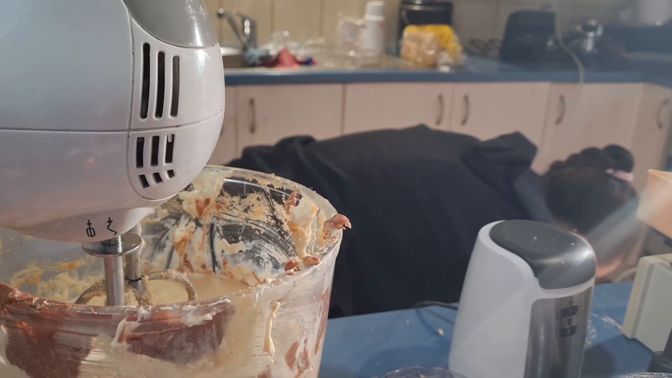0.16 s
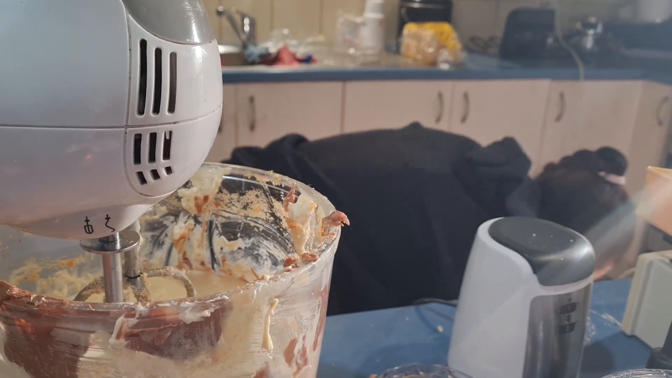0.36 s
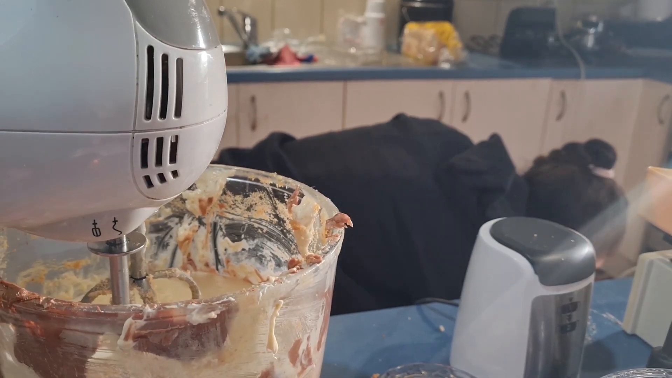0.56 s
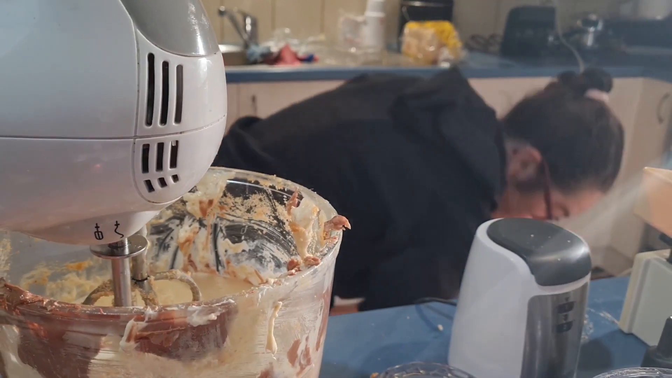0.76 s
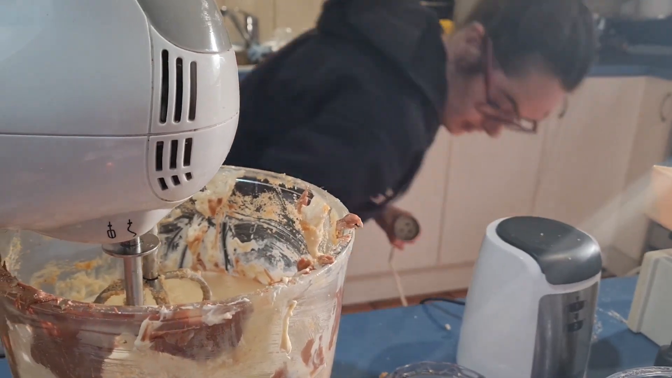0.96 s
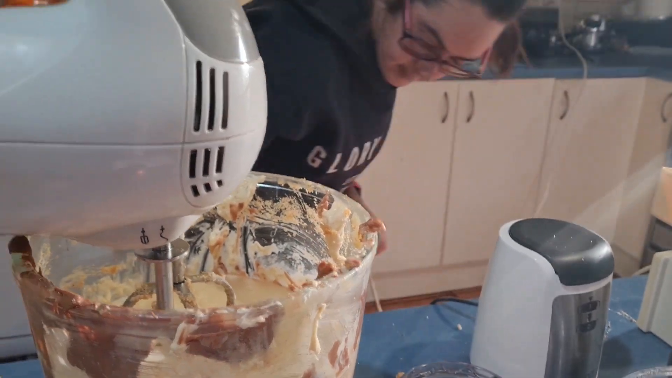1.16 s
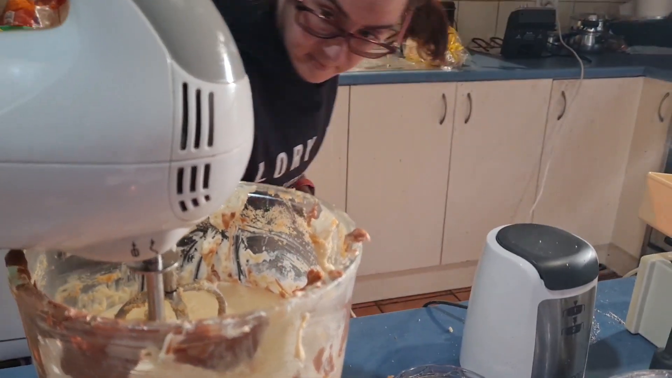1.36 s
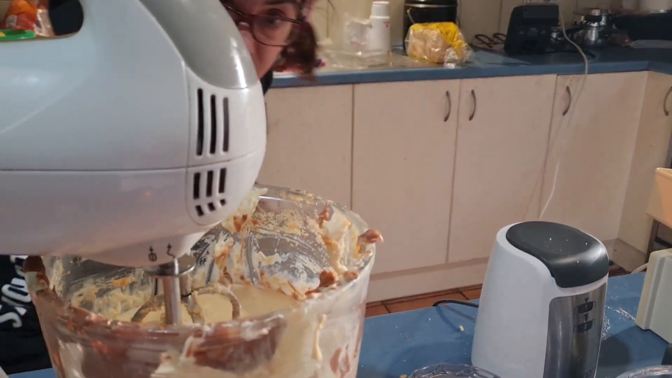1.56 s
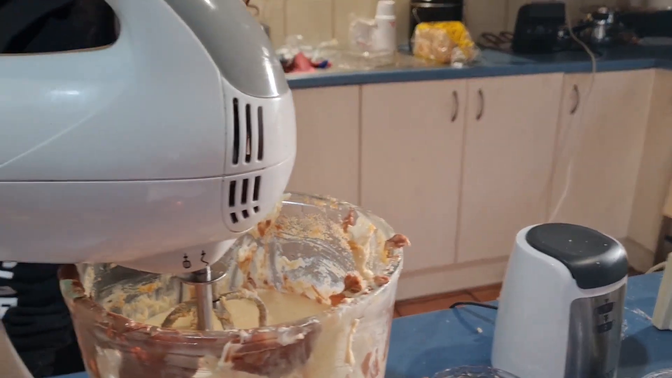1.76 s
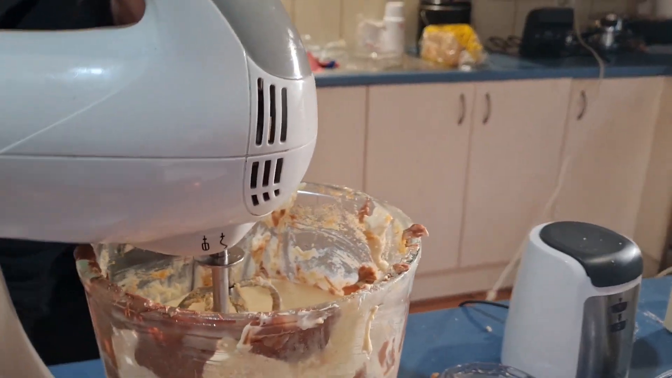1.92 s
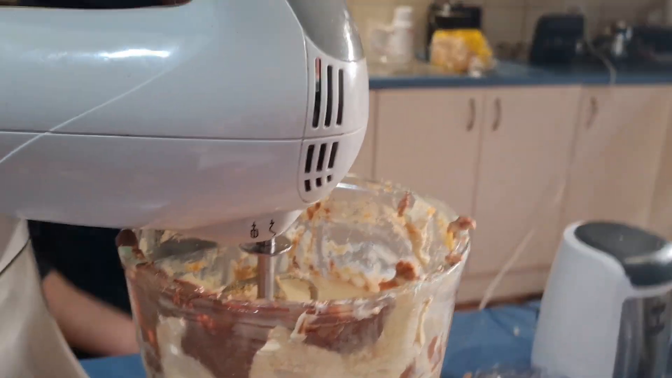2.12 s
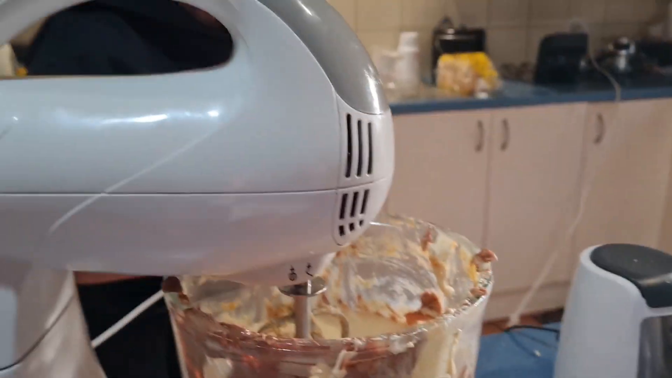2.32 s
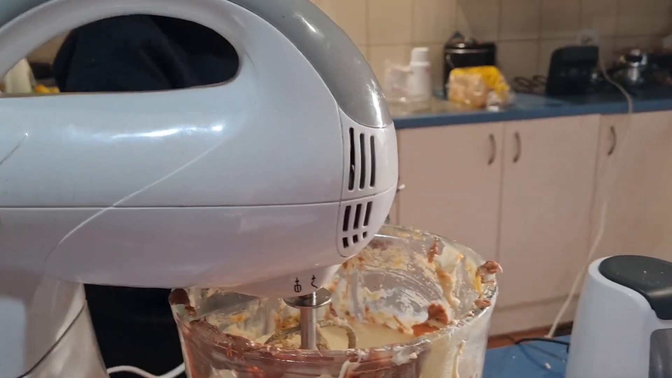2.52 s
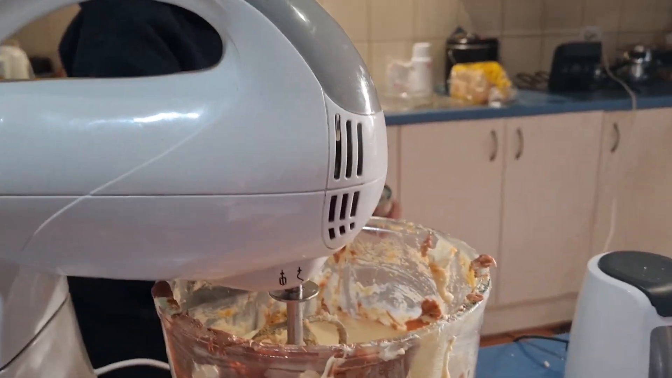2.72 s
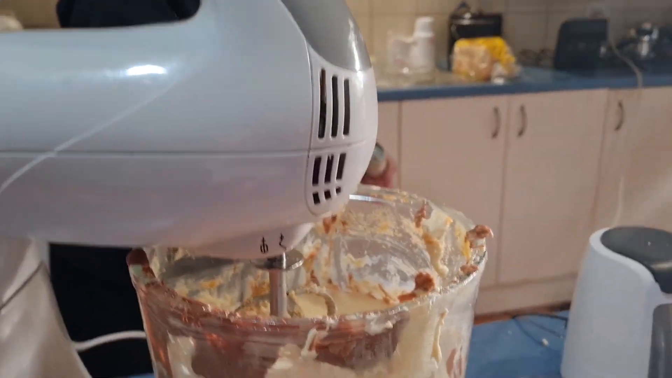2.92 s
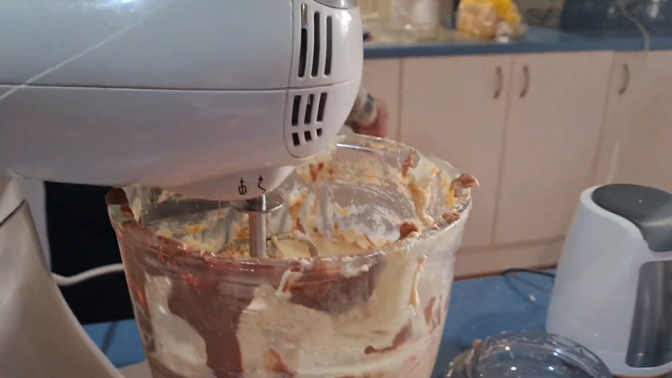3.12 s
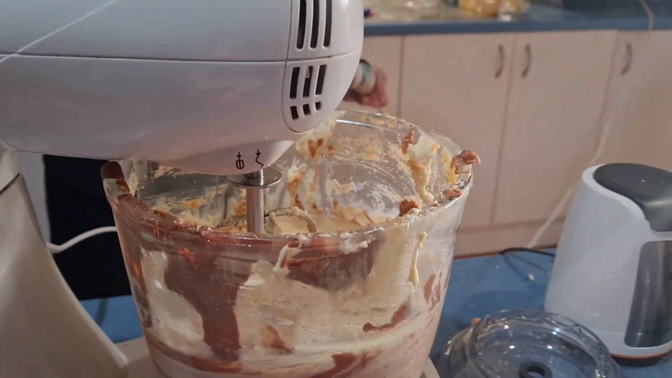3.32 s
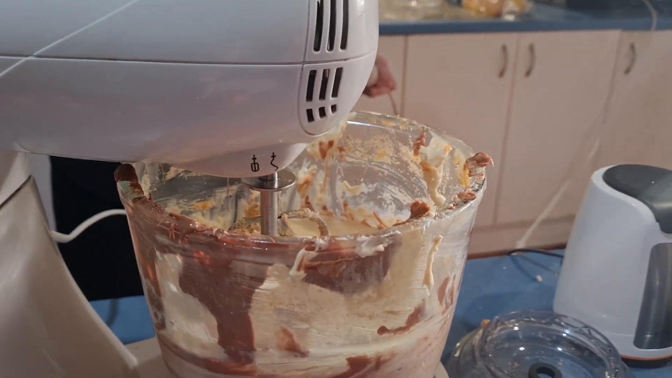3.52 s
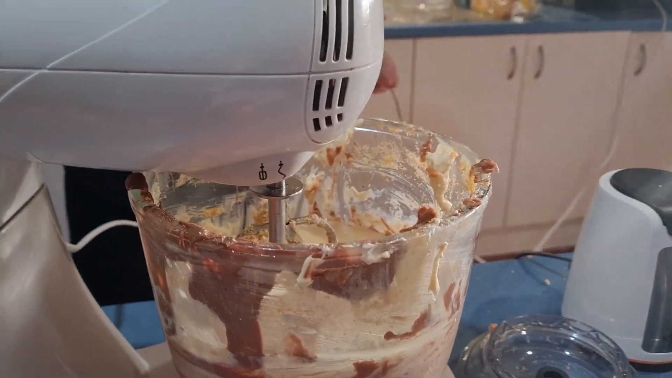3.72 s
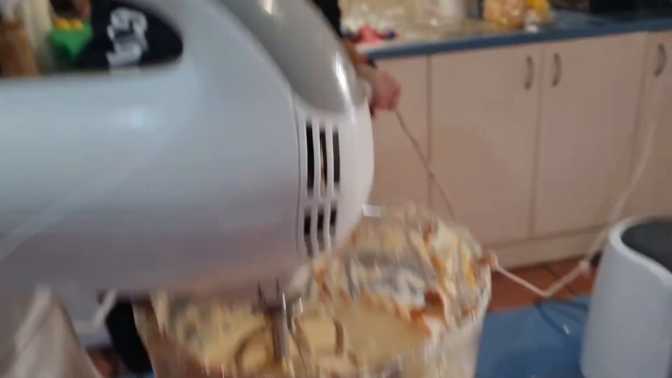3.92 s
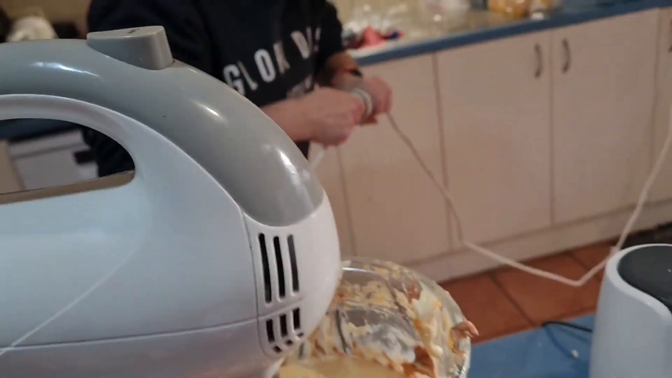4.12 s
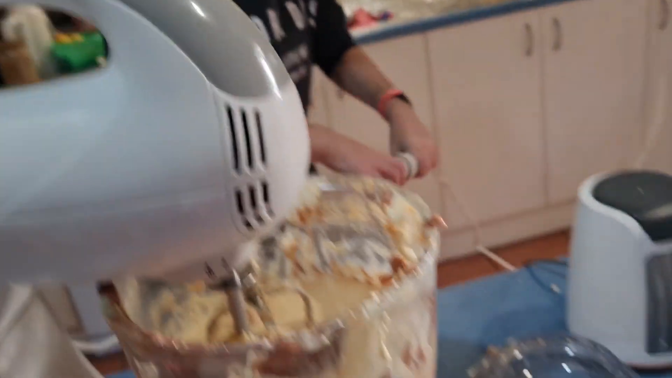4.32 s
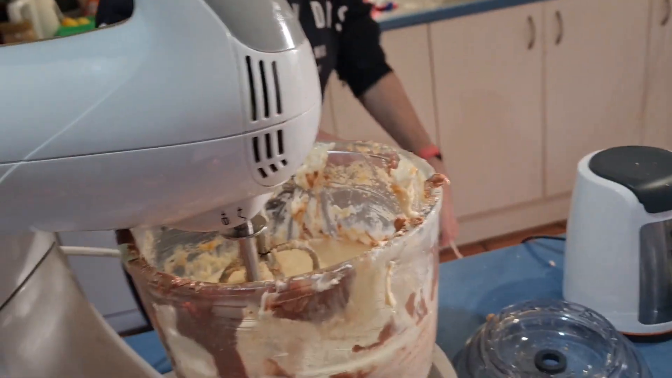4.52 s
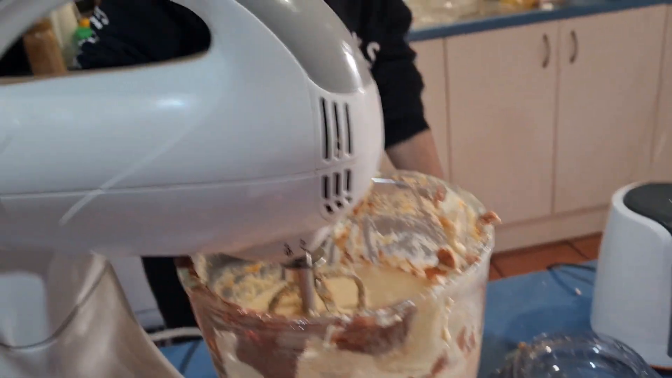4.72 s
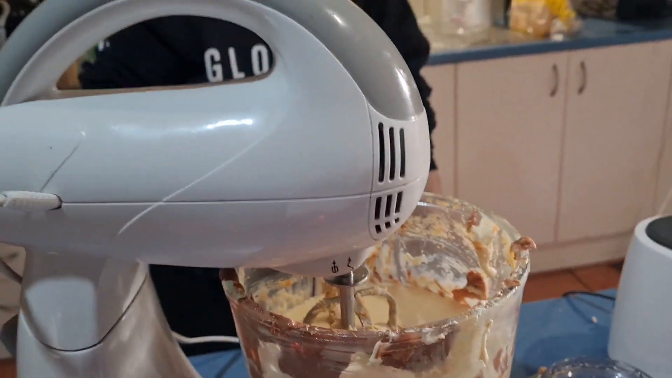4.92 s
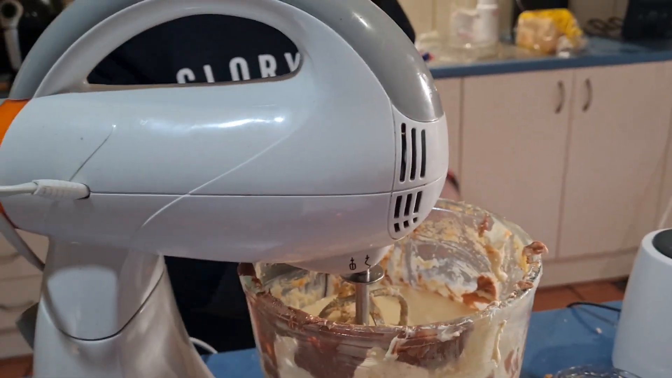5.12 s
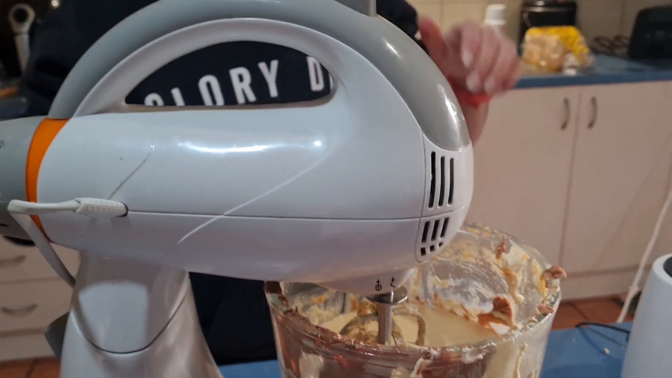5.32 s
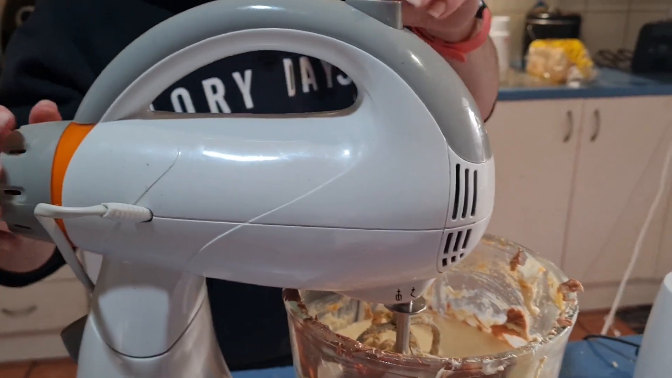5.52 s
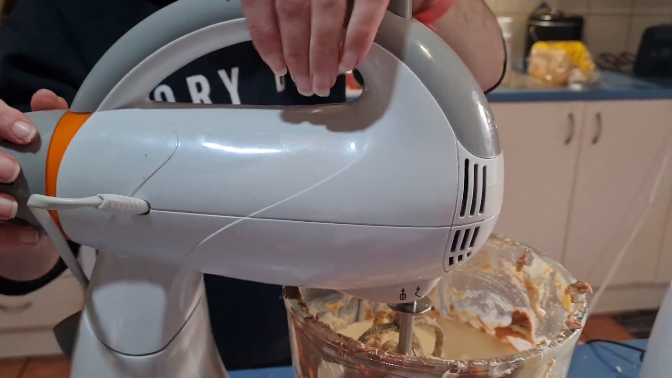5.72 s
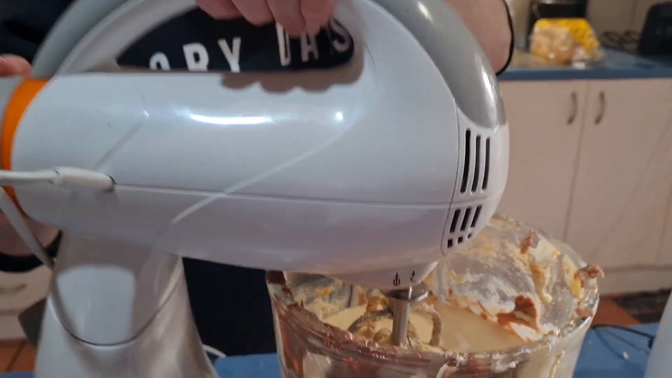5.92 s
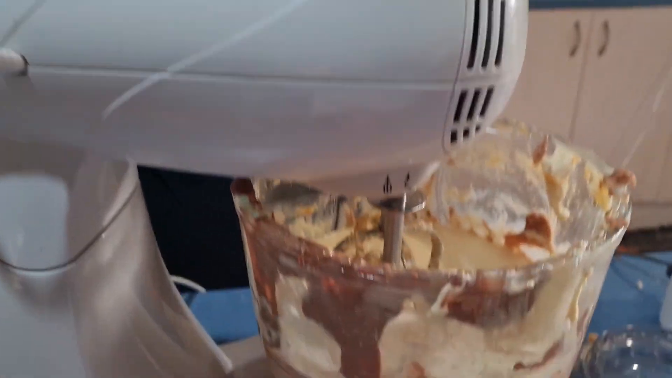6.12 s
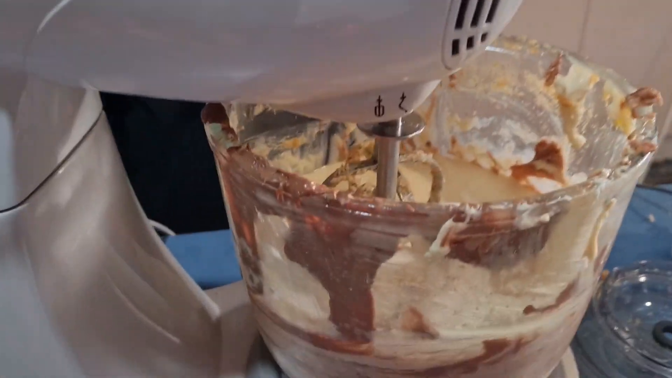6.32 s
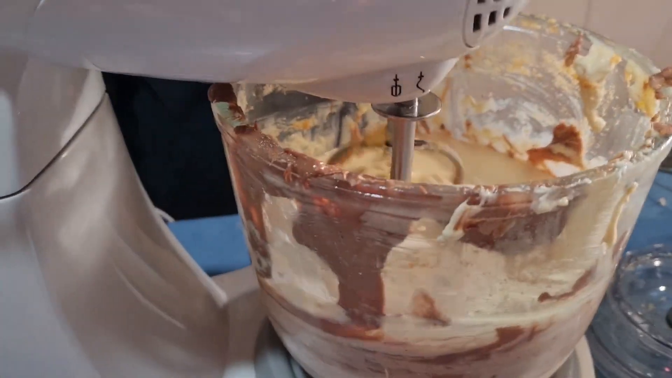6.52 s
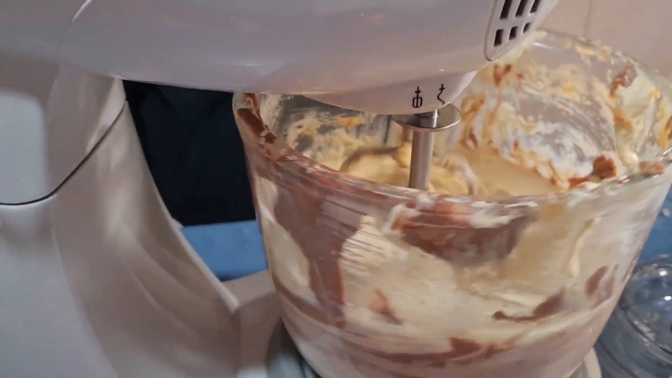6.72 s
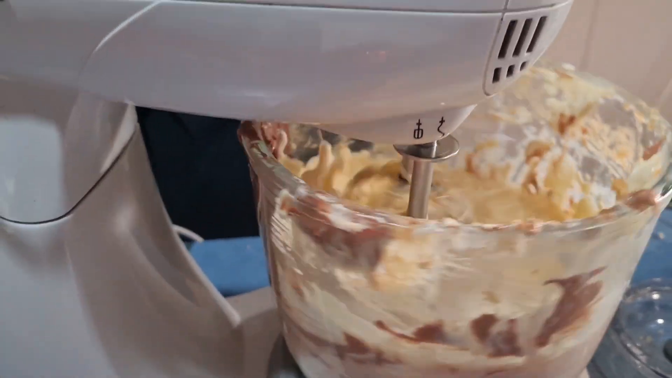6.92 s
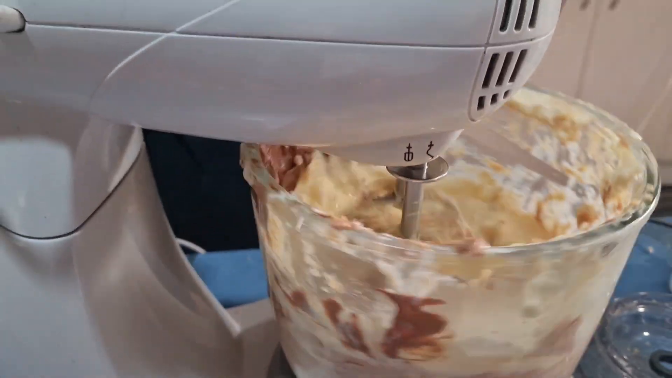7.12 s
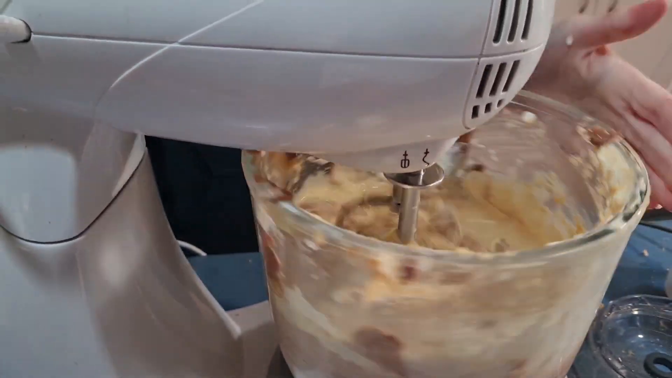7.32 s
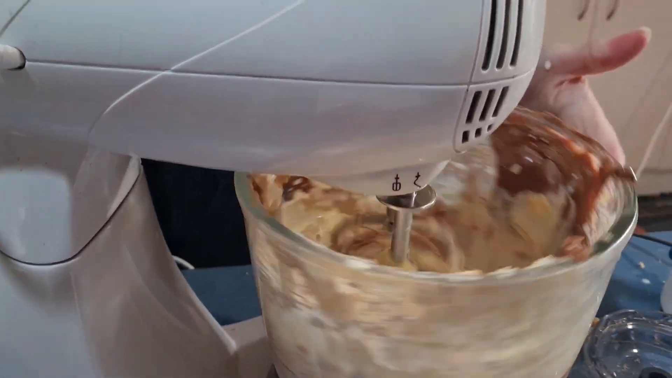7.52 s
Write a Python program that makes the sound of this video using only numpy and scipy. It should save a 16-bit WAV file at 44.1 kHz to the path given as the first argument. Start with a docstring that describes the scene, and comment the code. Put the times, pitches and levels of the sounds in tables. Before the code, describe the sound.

Soft cloth swishes, scattered plastic clacks and a thin singing cord lead to a sharp click and a stand mixer's rising, buzzing motor whine.

```python
"""A small kitchen: over room hush, sleeves swish, a plug knocks about, plastic scrapes and a pulled cord sings.
At 6.44 s a switch snaps, the housing rings and a hand mixer on its stand runs up with a jolt of mains hum.
Shaft and commutator tones, gear rattle, fan air and brush hiss follow its speed; sharp ticks cut in.
Rubbing and air are shaped noise, knocks are short clatters with ringing modes, tones follow the shaft angle."""
import sys
import numpy as np
from scipy import signal
from scipy.fft import rfft, irfft
from scipy.io import wavfile

SR = 44100
rng = np.random.default_rng(int(sys.argv[2]) if len(sys.argv) > 2 else 0)


def log_audio(samples):
    """Write samples as a 16-bit WAV file to the path given in sys.argv[1]."""
    # one column per channel
    frames = np.atleast_2d(samples).T
    # limit to full scale, then quantise
    limited = np.clip(frames, -1, 1)
    pcm = np.round(limited * 32767).astype(np.int16)
    wavfile.write(sys.argv[1], SR, pcm)


N = 337792
T, HZ = np.arange(N) / SR, np.fft.rfftfreq(N, 1 / SR)
ON_S, RIPPLE_HZ = 6.441, 100  # switching on; torque ripple of the mains
FULL_SPEED_HZ = 155.7  # shaft turns per second


def amp(db):
    """Amplitude of a level in dB."""
    return 10 ** (np.asarray(db) / 20)


def unit(x):
    """Scale to an RMS of 1."""
    return x / np.sqrt(np.mean(x ** 2, axis=-1, keepdims=True) + 1e-20)


def read(points, hz):
    """Interpolate a table over log frequency."""
    f, value = np.transpose(points)
    return np.interp(np.log(hz + 1), np.log(f + 1), value)


def colour(x, points):
    """Filter by a spectrum in dB."""
    return irfft(rfft(x) * amp(read(points, HZ)), N)


def noise(points):
    """A mid and side pair of noises with one spectrum."""
    return unit(colour(rng.standard_normal((2, N)), points))


def wander(hz):
    """Random fluctuation up to about the given rate."""
    return unit(irfft(rfft(rng.standard_normal(N)) / (1 + (HZ / hz) ** 4), N))


def add(mix, s, sound):
    """Mix a sound in at a time in s."""
    part = mix[:, max(round(s * SR), 0):][:, :sound.shape[-1]]
    part += sound[..., :part.shape[-1]]


def resonances(rows):
    """Noise in a few steep resonant bands, as mid and side."""
    out = np.zeros((2, N))
    for hz, width_hz, db in rows:
        response = 1 / (1 + ((HZ - hz) / width_hz) ** 2) ** 2
        out += amp(db) * unit(irfft(rfft(rng.standard_normal((2, N))) * response, N))
    return out


def kitchen(x):
    """Tiles and cupboard doors return a short dense tail of the mid, as mid and side."""
    # decay of the room: (frequency [Hz], t60 [s])
    decay = [(150, 0.33), (600, 0.32), (2500, 0.21), (6000, 0.23), (15000, 0.31)]
    taps = rng.standard_normal((2, SR // 2)) * (T[:SR // 2] > .005)
    hz, t, z = signal.stft(taps, SR, nperseg=256)
    fade = amp(-60 * t / read(decay, hz)[:, None])
    tail = signal.istft(z * fade, SR, nperseg=256)[1]
    return signal.fftconvolve(x[:1], tail / np.linalg.norm(tail[0]), axes=1)[:, :N]


def stroke(s, db, rise_s, t60_s, hold_s=0):
    """The power of one rubbing movement: it swells to a peak, holds and dies away."""
    swell = np.exp(-(np.minimum(T - s, 0) / rise_s) ** 2)
    return amp(db - 60 * np.maximum(T - s - hold_s, 0) / t60_s) ** 2 * swell


def friction(power, spectrum, grain_db):
    """Grainy rubbing noise that follows the power of the strokes."""
    return np.sqrt(power) * unit(amp(grain_db * wander(430))) * noise(spectrum)


def with_speed(speed_hz, db, growth_db):
    """Gain of a layer: dB at full speed, dB gained per doubling of speed."""
    return amp(db + growth_db * np.log2(speed_hz / FULL_SPEED_HZ + 1e-3))


def cycle(turns):
    """Cosine of an angle counted in turns."""
    return np.cos(2 * np.pi * turns)


def tone(turns, waver_db, smear):
    """One wavering partial; its side is a quarter turn off, so both ears hear it about equally loud."""
    mid = turns + smear * wander(26)
    side = mid - 1 / 4 + .05 * wander(2)
    return np.sqrt(2) * amp(waver_db * wander(13)) * cycle(np.array([mid, side]))


def room_tone(hush_db=-63.13):
    """Low hush as shaped noise, plus a few droning resonant bands."""
    # hush spectrum: (frequency [Hz], relative density [dB])
    hush = [(15, -38), (25, -8), (66, -2.5), (121, -3.5), (207, -0.5), (309, -4.5), (488, -4.5), (588, -4),
            (673, -5), (749, -10.5), (978, -13), (3010, -26), (5570, -37.5), (7680, -45), (15000, -47)]
    # faint drone of the room: (frequency [Hz], width [Hz], level [dB])
    drone = [(80.2, 6.3, -75.5), (224.5, 67, -71), (596, 20, -73.5), (753, 93, -73.5)]
    return amp(hush_db) * noise(hush) + resonances(drone)


def swishes(rise_s=.012, t60_s=0.29):
    """Sleeves: cloth friction, one power stroke per movement."""
    # sleeve strokes: (peak time [s], level [dB])
    strokes = [(.015, -64), (.65, -51.5), (0.999, -66.5), (1.317, -57.5), (1.523, -62.5), (1.86, -69),
               (2.4, -76), (3.174, -71.5), (4.41, -76.5)]
    # cloth spectrum: (frequency [Hz], relative density [dB])
    cloth = [(300, -17), (1500, 3), (3000, 5.5), (6000, -1), (8800, 1), (11000, -8.5), (15500, -9)]
    power = sum(stroke(s, db, rise_s, t60_s) for s, db in strokes)
    return friction(power, cloth, grain_db=2.5)


def knocks(level_db=1, ring_db=-13, body_hz=800, edge_hz=4200, spot_db=8, spot_width=0.19,
           rise_share=0.02, wet_db=-7):
    """Plug, cord and switch: each contact is a quick clatter with plug modes; soft has body, hard has edge."""
    # contacts: (time [s], relative level [dB], edge [dB], contact t60 [s], resonance of the struck spot [Hz])
    hits = [(.093, -50.5, 11.5, 0.2, 2080), (.630, -40.5, -8, 0.043, 2880), (.635, -44.5, -10, 0.24, 2160),
            (1.839, -54.5, -29, 0.21, 543), (1.88, -54, 26, 0.007, 3000), (1.907, -38.5, -54, 0.055, 1170),
            (2.055, -36, -31, 0.075, 1240), (2.390, -56, -5, 0.029, 3200),
            (2.457, -39.5, -13.5, 0.074, 2160), (2.553, -44, -58, 0.05, 1720), (2.592, -59, 0, 0.029, 3250),
            (3.272, -32.5, -2.5, 0.046, 3160), (3.496, -52.5, -3.5, .074, 2120),
            (3.792, -62.5, 6.5, 0.11, 2800), (3.867, -38, 0.5, 0.059, 2130),
            (4.725, -31.5, -2.5, .023, 2230), (5.512, -51.5, -7, 0.028, 2070),
            (5.726, -53.5, -59, 0.053, 1260), (5.839, -51, -30, 0.1, 1110), (5.868, -51, 11, 0.042, 3250),
            (5.918, -56, 9, 0.021, 3100), (6.435, -47, 19, 0.056, 804), (6.4423, -22.5, 9, 0.028, 980)]
    # plastic spectrum: (frequency [Hz], relative density [dB])
    plastic = [(30, -36), (100, 4.5), (300, -1.5), (600, 7.5), (1200, 2.5), (2300, -0.5), (3300, 0),
               (5000, -10), (7000, -18), (10000, -28.5), (15000, -36)]
    # ring of the plug: (nominal frequency [Hz], t60 [s], relative level [dB])
    plug = [(625, 0.28, 2), (1258, 0.086, 6), (1716, 0.078, 5.5), (2060, 0.11, -52), (2930, 0.06, 6)]
    # spots that ring lower also have more body
    neutral_hz, body_db_per_octave = 1900, 4.5
    out, t = np.zeros((2, N)), T[:SR // 4]
    hz = np.fft.rfftfreq(2 * len(t), 1 / SR)
    shell = unit(amp(read(plastic, hz)))
    for s, db, edge_db, t60_s, spot_hz in hits:
        # a long contact also builds up slowly
        build_up = 1 - np.exp(-t / (rise_share * t60_s))
        clatter = rng.standard_normal((2, len(t))) * amp(-60 * t / t60_s) * build_up
        ring = np.zeros((2, len(t)))
        for mode_hz, life_s, mode_db in plug:
            turns = mode_hz * rng.uniform(.93, 1.2) * t + rng.random((2, 1))
            ring += amp(mode_db - 60 * t / life_s) * np.sin(2 * np.pi * turns)
        body_db = body_db_per_octave * np.log2(neutral_hz / spot_hz)
        tilt_db = body_db / (1 + (hz / body_hz) ** 4) + edge_db / (1 + (edge_hz / (hz + 1)) ** 4)
        peak_db = spot_db / (1 + ((hz / spot_hz - 1) / spot_width) ** 2)
        source = rfft(clatter, 2 * len(t)) * shell + amp(ring_db) / 2 * rfft(ring, 2 * len(t))
        hit = irfft(source * amp(tilt_db + peak_db))[:, :len(t)]
        add(out, s, amp(db + level_db) * hit)
    return out + amp(wet_db) * kitchen(out)


def bumps_and_housing_ring():
    """Dull bumps of bench and stand, and the mixer housing ringing at switch-on: each is one decaying mode."""
    # bumps, last row the housing: (time [s], level [dB], frequency [Hz], t60 [s])
    modes = [(0.094, -46.5, 154.4, 0.36), (2.052, -38.5, 86.6, 0.17), (2.06, -37, 45, 0.18),
             (4.726, -51, 168, 0.15), (5.767, -51.5, 156, 0.21), (6.443, -29.5, 999, 0.33)]
    out, t = np.zeros((2, N)), T[:SR // 2]
    for s, db, hz, t60_s in modes:
        add(out, s, amp(db - 60 * t / t60_s) * np.sin(2 * np.pi * hz * t))
    return out


def scrapes(t60_per_rise=7.5):
    """Plastic sliding on plastic; a slow slide also dies slowly."""
    # slides: (peak time [s], level [dB], rise [s])
    slides = [(1.35, -61.5, 0.022), (2.33, -65, 0.017), (4.41, -64.5, .03), (4.916, -47.5, 0.028),
              (4.986, -44, 0.0083), (5.013, -42, 0.015), (5.19, -60, 0.021), (5.36, -69, 0.069)]
    # sliding spectrum: (frequency [Hz], relative density [dB])
    sliding = [(200, -22), (600, 0), (900, -5), (1230, 10.5), (1450, -3), (1800, -2), (2900, -7.5),
               (4000, -23.5), (7000, -32), (15000, -47)]
    power = sum(stroke(s, db, rise_s, t60_per_rise * rise_s) for s, db, rise_s in slides)
    return friction(power, sliding, grain_db=1.8)


def cord(rise_s=0.021, t60_s=1.12, held_hz=4440, hold_power=5.7):
    """Each pull through the hand makes the cord sing in resonant bands; low partials drop out first."""
    # pulls: (time [s], hold [s], level [dB], pitch [share of the cord's own])
    pulls = [(2.39, 0.04, -68.5, .97), (2.83, 0.12, -72, 0.91), (4.56, 0.42, -66.5, 0.99)]
    # partials of the cord: (frequency before pitch [Hz], width [Hz], relative level [dB])
    partials = [(2540, 120, -3), (3210, 210, -4), (4530, 1000, -9.5), (5250, 200, -18)]
    out = np.zeros((2, N))
    for s, hold_s, db, pitch in pulls:
        for hz, width_hz, partial_db in partials:
            # partials from held_hz up hold for the whole pull
            held_share = min(hz / held_hz, 1) ** hold_power
            power = stroke(s, db, rise_s, t60_s, hold_s * held_share)
            out += np.sqrt(power) * resonances([(pitch * hz, width_hz, partial_db)])
    return out


def handling(wet_db=-10):
    """Sleeves, bumps, housing ring, sliding plastic and the cord, with the kitchen's tail."""
    out = swishes() + bumps_and_housing_ring() + scrapes() + cord()
    return out + amp(wet_db) * kitchen(out)


def mains_hum(ripple, speed_hz, inrush_db=-28, inrush_t60_s=0.61, inrush_slope_db=-6, surge_hum_db=-7):
    """Field coils hum at ripple multiples; the stalled motor's current surge adds hum and a stand shudder."""
    # hum of the field coils: (relative level [dB]) at each multiple of the ripple
    hum_db = [-56, -33.5, -74, -45, -43.5, -34.5, -43, -50]
    # shudder of the stand as the motor takes hold: (frequency [Hz], relative density [dB])
    jolt = [(50, -39), (130, -1.5), (280, -4.5), (450, -19), (2000, -63)]
    surge = amp(inrush_db - 60 * np.maximum(T - ON_S, 0) / inrush_t60_s)
    shake = with_speed(speed_hz, -2.5, growth_db=9.5)
    out = surge * noise(jolt)
    for k, db in enumerate(hum_db, 1):
        surge_hum = surge * amp(inrush_slope_db * abs(k - 2) + surge_hum_db)
        out += (amp(db) * shake + surge_hum) * tone(k * ripple, waver_db=3.0, smear=0.048)
    return out


def shaft_throb(shaft, ripple, speed_hz):
    """An unbalanced rotor, its force growing with speed and its torque pulsing with the mains."""
    # shaft tones: (multiple of the shaft, sideband [steps of the ripple])
    partials = [(1, 0), (1, 1), (1, 2), (3, 0), (4, 0), (5, 0), (5, 1), (12, -1), (12, 0), (12, 1), (17, 0),
                (23, 0), (25, 0), (48, 0)]
    # their levels: (relative level [dB])
    partials_db = [-7.5, -6.5, -20.5, -29, -23, -23, -19, -25, -21, -26.5, -24.5, -47, -24.5, -38]
    out = np.zeros((2, N))
    for (k, sideband), db in zip(partials, partials_db):
        waver_db, smear = min(2.0 * np.sqrt(k), 3), 0.011 * np.sqrt(k)
        out += amp(db) * tone(k * shaft + sideband * ripple, waver_db, smear)
    return with_speed(speed_hz, -24.5, growth_db=25.5) * out


def whine(shaft, speed_hz, bars=24, clear_db=-35, chatter_db=-46.5, chatter_growth_db=6):
    """Commutator bars sing out at each housing resonance; between them only chatter is left."""
    # resonances of the housing: (frequency [Hz], width [Hz], relative level [dB])
    housing = [(2720, 130, -4), (3170, 230, 0), (3835, 65, -2.5), (4010, 40, -4)]
    clear = sum(amp(clear_db + db) / (1 + ((bars * speed_hz - hz) / width_hz) ** 4)
                for hz, width_hz, db in housing)
    chatter = with_speed(speed_hz, chatter_db, chatter_growth_db) * wander(160)
    return (clear + chatter) * tone(bars * shaft, waver_db=2.0, smear=.06)


def gear_rattle(shaft, ripple, speed_hz, load_s=6.91, load_rise_s=0.02, load_db=3.5):
    """Gear noise pulses with turn and current, and gets louder once the bowl starts to turn."""
    # gear spectrum: (frequency [Hz], relative density [dB])
    gears = [(30, -48), (60, -15), (90, -5), (130, -0.5), (240, 1), (310, -2), (440, -5), (540, -7),
             (630, 4.5), (780, -2), (860, -2.5), (960, 1.5), (1100, -8.5), (1500, -48)]
    load = np.clip((T - load_s) / load_rise_s, 0, 1)
    pulse = unit(amp(0.75 * cycle(shaft) + 1.0 * cycle(ripple) + 1.5 * wander(52)))
    return with_speed(speed_hz, -31 + load_db * load, growth_db=1) * noise(gears) * pulse


def fan_air(shaft, ripple, speed_hz, buzz_db=-4):
    """The fan blows through the vents; rough spots passing the brushes add a comb of shaft multiples."""
    # air spectrum, also colours the buzz: (frequency [Hz], relative density [dB])
    vents = [(40, -40), (700, -9.5), (1200, 3.5), (1400, 3), (1600, 0), (1950, 4.5), (2400, -3),
             (2800, 1.5), (3200, 2.5), (3500, -4), (3850, -3.5), (4400, -5), (5500, -11.5), (7000, -24.5)]
    air = noise(vents) * unit(amp(0.33 * cycle(shaft) + 0.87 * cycle(ripple) + 1.16 * wander(100)))
    on = T > ON_S
    comb = np.zeros((2, N))
    for k in range(5, 33):
        phase = rng.random((2, 2, 1))
        # the pulsing current splits each multiple
        comb[:, on] += cycle(k * shaft[on] + phase[0]) * (1 + cycle(ripple[on] + phase[1]))
    # unit() spans the silence before switching on; the root of the running share corrects for it
    buzz = amp(buzz_db) * unit(colour(comb, vents)) * np.sqrt(on.mean())
    return with_speed(speed_hz, -33, growth_db=3.2) * (air + buzz)


def brush_hiss(ripple, speed_hz):
    """The brushes hiss with the current."""
    # brush spectrum: (frequency [Hz], relative density [dB])
    brushes = [(100, -30), (3000, -18), (5500, 2), (7200, -1), (7900, -3), (8300, -1.5), (9000, 3.5),
               (9700, -1.5), (13000, -3.5), (15500, -3.5)]
    pulse = unit(amp(0.64 * cycle(ripple) + 1.1 * wander(600)))
    return with_speed(speed_hz, -43, growth_db=10.5) * noise(brushes) * pulse


def ticks(t60_s=.014, snap_hz=10000, wet_db=-7):
    """Beaters and brushes: short decaying snaps of noise around a bright resonance."""
    # ticks: (time [s], relative level [dB])
    snaps = [(6.465, -41), (6.726, -37), (6.9615, -28), (6.987, -36), (7.1325, -33), (7.1815, -35),
             (7.284, -37)]
    out, t = np.zeros((2, N)), T[:SR // 20]
    b, a = signal.iirpeak(snap_hz, 2, fs=SR)
    for s, db in snaps:
        snap = unit(signal.lfilter(b, a, rng.standard_normal((2, len(t)))))
        add(out, s, 2 * amp(db - 60 * t / t60_s) * snap)
    return out + amp(wet_db) * kitchen(out)


def mixer(run_up_s=.170, creep_hz_per_s=9.3, jitter=0.00078, fade_in_s=0.0071):
    """Exponential run-up, then a creep as the batter loosens; speed, shaft and mains phase drive the layers."""
    since_s = np.maximum(T - ON_S, 0)
    speed_hz = (FULL_SPEED_HZ + creep_hz_per_s * since_s) * (1 - np.exp(-since_s / run_up_s))
    # angles in turns
    shaft = np.cumsum(speed_hz * (1 + jitter * wander(14.3))) / SR
    ripple = RIPPLE_HZ * T
    tones = mains_hum(ripple, speed_hz) + shaft_throb(shaft, ripple, speed_hz) + whine(shaft, speed_hz)
    noises = gear_rattle(shaft, ripple, speed_hz) + fan_air(shaft, ripple, speed_hz)
    running = tones + noises + brush_hiss(ripple, speed_hz)
    return running * np.minimum(since_s / fade_in_s, 1) + ticks()


def scene():
    """Sum the sources as mid and side, shape the side over frequency, decode to left and right."""
    # stereo width: (frequency [Hz], side gain [dB])
    width = [(30, -10), (70, -7), (170, -17.5), (300, -4), (600, -1.5), (1000, 2.5), (2000, -1),
             (15000, -0.5)]
    mid, side = room_tone() + handling() + knocks() + mixer()
    side = colour(side, width)
    return np.array([mid + side, mid - side])


def record(dry, edge_hz=15950):
    """The recorder's band limit: a steep linear-phase low-pass."""
    taps = signal.firwin(511, edge_hz, window=("kaiser", 9), fs=SR)
    return signal.oaconvolve(dry, taps[None], "same")


dry = scene()
out = record(dry)
log_audio(out)
```